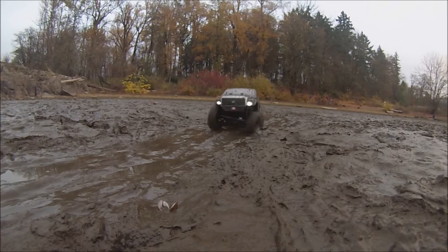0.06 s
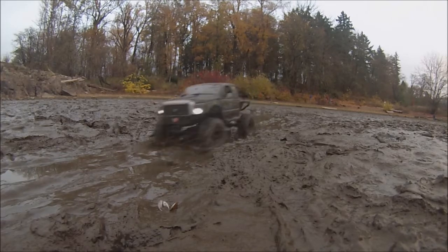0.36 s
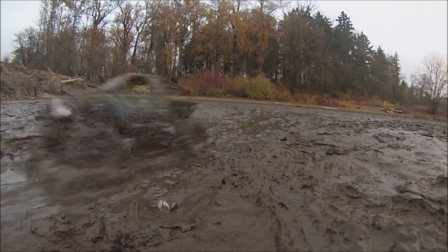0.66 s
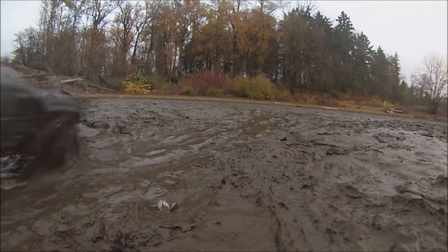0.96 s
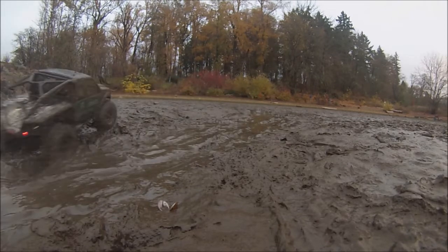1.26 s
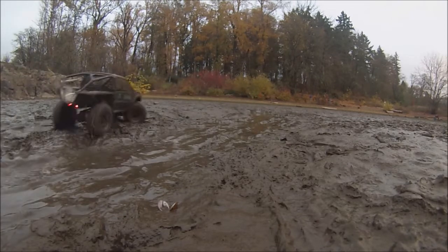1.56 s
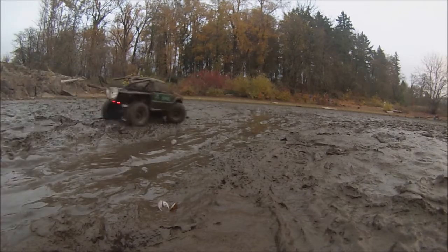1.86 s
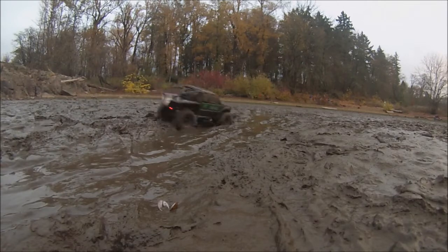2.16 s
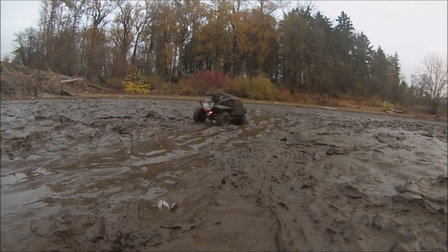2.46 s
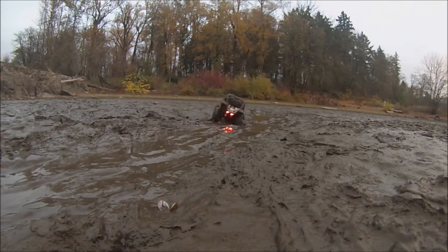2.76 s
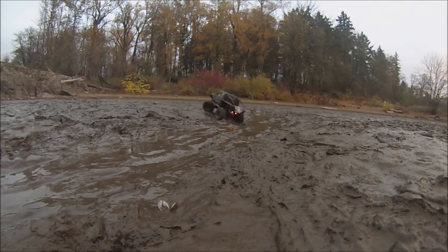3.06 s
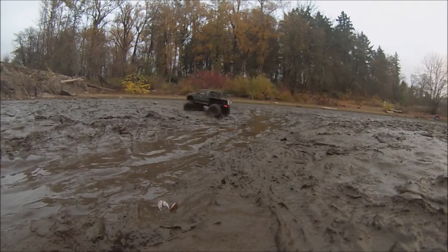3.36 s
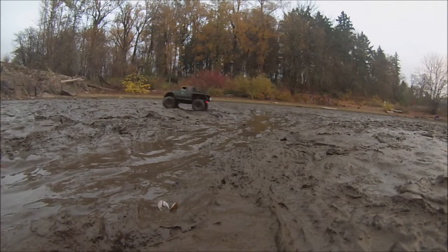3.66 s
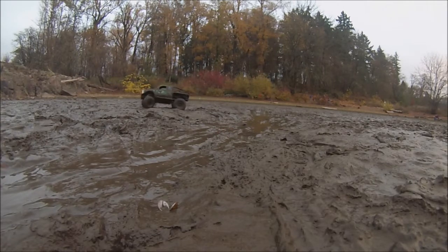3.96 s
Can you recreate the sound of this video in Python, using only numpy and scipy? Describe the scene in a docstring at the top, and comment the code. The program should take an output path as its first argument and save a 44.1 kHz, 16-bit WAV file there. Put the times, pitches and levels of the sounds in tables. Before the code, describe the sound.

A small remote-controlled truck drives through mud outdoors, its electric motor whining unevenly. Its gears rattle close by as mud splatters faintly and air buffets the microphone, then the whine continues more softly in short bursts.

```python
"""A small radio-controlled truck churns through mud close by, under the hush of open ground. From the
start its gears whine at the tooth rate, sagging as the tyres bite and rising as they slip. From 0.14 s
a second electric drive whines and rattles nearby, its teeth exciting resonances in a plastic housing.
Gears squeal briefly, mud spatters and air buffets the microphone. At 1.64 s the second drive cuts
out, and the truck drives off, still splashing, its fainter whine singing out in short bursts."""
import sys
import numpy as np
from scipy import signal
from scipy.fft import rfft, irfft
from scipy.io import wavfile
from scipy.ndimage import uniform_filter1d, map_coordinates

SR = 44100
rng = np.random.default_rng(int(sys.argv[2]) if len(sys.argv) > 2 else 0)


def wav_record(signal):
    """Record a signal, one row per channel, as 16-bit PCM in the file named by sys.argv[1]."""
    frames = np.transpose(np.atleast_2d(signal))
    bounded = np.clip(frames, -1, 1)
    # unit amplitude maps onto the largest positive 16-bit level
    quanta = np.round(bounded * 32767).astype(np.int16)
    wavfile.write(sys.argv[1], SR, quanta)


N = 176400
T = np.arange(N) / SR

# Spectra of the open air and of the buffeting: frequency_hz, gain_db
AIR_SPECTRUM = [(30, 2), (120, 0.5), (200, -4), (400, -6.5), (1000, -13), (2000, -17.5), (4000, -18.5),
                (7000, -26), (11000, -32.5), (15000, -44)]
BUFFET_SPECTRUM = [(15, -4.5), (32, 9), (48, -0.5), (66, 8.5), (88, -3.5), (150, -20.5), (400, -38)]
# Gusts on the microphone: time_s, level_db
BUFFET_LEVEL = [(0.0, -66), (0.61, -58.5), (0.65, -47.5), (0.91, -55), (0.99, -41.5), (1.08, -56),
                (1.15, -50), (1.18, -60), (1.3, -49.5), (1.34, -66), (1.39, -52), (1.64, -65.5),
                (3.89, -70.5), (4.0, -86)]
# Spectrum of the mud drops: frequency_hz, gain_db
MUD_SPECTRUM = [(800, -23), (2000, -25), (4000, 0), (5500, 2), (6800, 5.5), (8500, -13.5), (10500, 2),
                (13000, -24), (15000, -38)]
# Larger splashes: time_s, level_db, rise_s
MUD_SPLASHES = [(0.448, -54.5, 0.011), (0.805, -53.5, 0.011), (1.198, -55, 0.018), (1.631, -57, 0.005),
                (1.756, -59.5, .018), (1.897, -62, 0.009), (1.961, -60.5, 0.0066), (2.551, -64, 0.0057),
                (2.684, -64, 0.0047), (3.508, -61.5, 0.0054), (3.806, -63.5, 0.0061)]
# Brief gear squeals: centre_s, length_s, start_hz, end_hz, relative_level_db
GEAR_SQUEALS = [(0.189, 0.054, 1280, 1210, -48.5), (0.24, 0.021, 2430, 2270, -41.5),
                (1.226, 0.032, 1487, 1640, -48), (1.508, 0.022, 1120, 1210, -52.5),
                (1.591, 0.12, 1390, 1344, -54), (2.969, 0.067, 1650, 1470, -61.5)]

# Near drive's whine: time_s, tooth_rate_hz, level_db
NEAR_MESH = [(0.13, 2396, -56), (0.396, 2380, -65), (0.558, 2424, -80), (0.628, 2408, -46),
             (0.692, 2311, -47.5), (0.752, 2379, -52), (0.83, 2384, -38.5), (0.88, 2310, -45),
             (0.984, 2232, -48), (1.042, 2445, -40), (1.08, 2445, -42), (1.122, 2295, -32.5),
             (1.15, 2342, -48), (1.175, 2379, -39.5), (1.192, 2329, -34.5), (1.25, 2288, -34),
             (1.26, 2380, -44), (1.27, 2397, -38.5), (1.314, 2404, -39.5), (1.336, 2486, -39.5),
             (1.37, 2413, -38), (1.395, 2416, -35), (1.44, 2372, -43.5), (1.514, 2426, -33),
             (1.536, 2350, -37.5), (1.58, 2483, -37), (1.63, 2274, -44.5)]
# Its second harmonic: time_s, level_db
NEAR_OCTAVE_LEVEL = [(.13, -71), (.95, -64), (1.04, -56), (1.23, -58), (1.3, -63), (1.51, -63), (1.63, -66)]
# Its other gears: tooth_rate_multiple, level_db
NEAR_GEAR_TONES = [(0.355, -67.5), (.48, -59.5), (0.529, -63), (.56, -61), (1.215, -61.5)]
# Its rattle: time_s, relative_mid_db, relative_treble_db
NEAR_RATTLE_LEVEL = [(0.14, -47.5, -56), (0.2, -53, -56.5), (0.23, -54, -50.5), (0.254, -51, -58),
                     (0.312, -51.5, -53), (0.65, -50.5, -53), (1.008, -45.5, -49.5), (1.012, -46.5, -48.5),
                     (1.492, -55, -52.5), (1.508, -42, -53), (1.532, -58, -52.5), (1.62, -56, -57)]
# Its housing's resonances, middle range and treble: frequency_hz, gain_db
NEAR_MID_MODES = [(300, -19), (620, -13.5), (790, -18.5), (1010, -11), (1120, 7.5), (1300, 2), (1560, 2.5),
                  (1740, -11), (1900, 3), (2150, -7), (2420, 7), (2720, -3), (2950, -1), (3180, -13.5),
                  (4000, -35)]
NEAR_TREBLE_MODES = [(2600, -21), (3200, -8), (3500, 8), (3800, 6), (4300, -8.5), (4900, -1), (5200, 2),
                     (5600, -10.5), (6200, -1.5), (7000, -4), (8000, -11.5), (8700, -15.5), (10300, -10.5),
                     (12500, -26), (15000, -44)]

# Truck's gear speed: time_s, tooth_rate_hz
TRUCK_MESH = [(0.0, 2310), (0.09, 2207), (0.125, 2240), (0.16, 1997), (0.205, 1834), (0.235, 1885),
              (0.29, 2146), (0.322, 1836), (0.35, 1852), (0.372, 1992), (0.438, 2160), (0.46, 2014),
              (0.492, 2170), (0.552, 2135), (0.65, 2250), (0.784, 2133), (0.834, 1900), (0.874, 2222),
              (0.98, 1884), (1.07, 2299), (1.115, 1978), (1.17, 2213), (1.225, 1949), (1.328, 2160),
              (1.38, 1927), (1.425, 1826), (1.45, 2016), (1.49, 2119), (1.53, 1877), (1.572, 2122),
              (1.615, 2042), (1.655, 1792), (1.7, 2060), (1.736, 2063), (1.799, 1792), (1.84, 2057),
              (1.884, 2168), (1.93, 1804), (2.02, 2194), (2.128, 2104), (2.266, 2450), (2.344, 2040),
              (2.39, 2293), (2.43, 2020), (2.485, 2300), (2.525, 2067), (2.551, 1860), (2.595, 2174),
              (2.625, 2268), (2.67, 2022), (2.697, 1815), (2.745, 2313), (2.773, 2258), (2.82, 1711),
              (2.878, 2250), (2.965, 1812), (3.036, 2000), (3.12, 1936), (3.196, 2116), (3.23, 2013),
              (3.27, 1809), (3.352, 1962), (3.41, 1896), (3.452, 2088), (3.495, 2051), (3.535, 1806),
              (3.58, 2127), (3.62, 2033), (3.698, 1800), (3.762, 2166), (3.79, 2180), (3.82, 1862),
              (3.895, 2337), (3.938, 1960), (3.958, 1906), (4.0, 2136)]
# Its whine between bursts, its upper partials together, and its slow gear: time_s, level_db
TRUCK_WHINE_LEVEL = [(0, -49.5), (.3, -51), (.65, -48), (1.0, -54.5), (1.6, -49), (1.8, -56.5),
                     (2.3, -55.5), (2.95, -60), (3.68, -63), (3.77, -57.5), (4, -55)]
TRUCK_PARTIALS_LEVEL = [(0, -67.5), (1.6, -74.5), (2.2, -72.5), (2.8, -71), (4, -77)]
TRUCK_SLOW_GEAR_LEVEL = [(0, -73), (1.0, -64), (1.5, -69), (2.25, -68.5), (2.6, -76), (4, -72)]
# The gear whine and its octave sing out in short bursts: start_s, length_s, level_db
WHINE_BURSTS = [(.16, 0.034, -33.5), (.214, 0.037, -38), (.301, 0.025, -36.5), (.328, .033, -38.5),
                (.822, 0.041, -43.5), (1.02, 0.086, -43.5), (1.195, 0.021, -42), (1.34, 0.024, -39),
                (1.405, 0.028, -48), (1.445, 0.035, -46), (1.497, 0.029, -45), (1.59, 0.035, -45.5),
                (1.69, 0.081, -57), (1.89, .017, -50), (1.952, 0.029, -51), (2.035, 0.091, -49),
                (2.122, .055, -47), (2.41, 0.048, -50), (2.5, .03, -53.5), (2.526, 0.023, -42),
                (2.557, 0.026, -47), (2.6, 0.048, -54.5), (2.66, .03, -43), (2.708, 0.019, -49),
                (2.735, 0.054, -46.5), (2.785, 0.023, -48), (2.842, 0.025, -49), (2.872, 0.021, -49),
                (2.9, 0.04, -48.5), (3.025, 0.074, -45), (3.13, 0.094, -53), (3.437, .08, -51),
                (3.566, 0.066, -45), (3.801, 0.017, -47), (3.828, 0.019, -54), (3.925, 0.022, -44.5),
                (3.964, 0.042, -54)]
OCTAVE_BURSTS = [(.213, 0.021, -50.5), (.342, 0.013, -53), (1.755, 0.039, -62), (2.5, 0.027, -64),
                 (2.54, 0.029, -57), (2.775, 0.031, -67), (2.9, 0.032, -61), (3.118, 0.052, -60.5),
                 (3.21, 0.027, -63), (3.355, 0.034, -62), (3.413, 0.015, -54.5), (3.455, .03, -60.5),
                 (3.504, .018, -54.5), (3.69, 0.049, -65), (3.78, 0.034, -67), (3.925, 0.025, -62)]
# Upper gear partials: tooth_rate_multiple, gain_db
TRUCK_PARTIALS = [(1.558, 0), (1.799, -1.5), (2, 2.5), (2.138, -11), (3.002, -13)]
# How strongly the body radiates them: frequency_hz, gain_db
BODY_RADIATION = [(3400, -2), (3750, 4), (4550, -4.5), (5400, -18), (5650, 19), (5900, -36)]
# Truck's rattle, middle range and treble: time_s, relative_level_db
TRUCK_MID_RATTLE = [(1.68, -55), (2.2, -64), (2.53, -58.5), (2.62, -67.5), (2.68, -55.5), (2.7, -60.5),
                    (3.43, -61.5), (4.0, -55)]
TRUCK_TREBLE_RATTLE = [(1.7, -59.5), (2.3, -62), (2.8, -67), (3.5, -63), (4, -66.5)]
# Its housing's resonances, middle range and treble: frequency_hz, gain_db
TRUCK_MID_MODES = [(500, -23), (750, -14.5), (1000, -8), (1200, 1), (1360, 10), (1720, -15.5), (2100, 2.5),
                   (2700, -6), (3300, -11), (5000, -39.5)]
TRUCK_TREBLE_MODES = [(2300, -21), (3000, 0.5), (3800, -6), (4400, -1.5), (5000, -2.5), (5350, -12.5),
                      (5700, -7), (6200, -7.5), (6650, 4.5), (7100, -8), (8600, -19.5), (10400, -12),
                      (12000, -19), (15000, -34)]

# Spectra of the near drive's thrum and of the air's stereo width: frequency_hz, gain_db
THRUM_SPECTRUM = [(60, 0), (150, 0.5), (500, -4.5), (1000, -2.5), (3000, -61)]
WIDTH_SPECTRUM = [(30, -16), (200, 2.5), (600, 3.5), (2000, -16), (4500, -6.5), (10000, -8.5),
                  (15000, -49)]


def undb(db):
    """Amplitude ratio: a factor of ten for every 20 dB."""
    return 10 ** (np.asarray(db) / 20)


def curve(rows, column=1):
    """Linear interpolation of one table column in time."""
    rows = np.array(rows, float)
    return np.interp(T, rows[:, 0], rows[:, column])


def unit(x):
    """Normalisation to rms 1."""
    return x / np.sqrt(np.mean(x ** 2) + 1e-20)


def colour(x, spectrum):
    """Minimum-phase filtering: resonances ring only after their excitation; rms 1."""
    hz, db = np.array(spectrum, float).T
    f = np.maximum(np.arange(N // 2 + 1) * SR / N, 1)
    gain = undb(np.interp(np.log(f), np.log(hz), db))
    cepstrum = irfft(np.log(gain), N)
    cepstrum[1:N // 2] *= 2  # folding the cepstrum makes the response causal
    cepstrum[N // 2 + 1:] = 0
    return unit(irfft(rfft(x) * np.exp(rfft(cepstrum)), N))


def walk(cutoff_hz):
    """Smooth random fluctuation: low-passed noise of rms 1."""
    f = np.arange(N // 2 + 1) * SR / N
    return unit(irfft(rfft(rng.standard_normal(N)) / (1 + (f / cutoff_hz) ** 2), N))


def flutter(depth_db):
    """Random amplitude modulation with capped peaks; rms 1."""
    return unit(undb(depth_db * np.minimum(walk(24), 1)))


def noise(spectrum):
    """Spectral shaping of white noise; rms 1."""
    return colour(rng.standard_normal(N), spectrum)


def air():
    """Broadband noise, nearly steady: the hush of open ground."""
    return undb(-59.5 + 0.71 * walk(3.4)) * noise(AIR_SPECTRUM)


def buffeting():
    """Pressure fluctuations of air on the microphone make a low rumble."""
    return undb(curve(BUFFET_LEVEL)) * noise(BUFFET_SPECTRUM)


def drops(per_s, decay_s=0.003):
    """Shot noise: mud drops land at random, each a tick with an exponential tail."""
    ticks = (rng.random(N) < per_s / SR) * rng.standard_normal(N)
    tail = rng.standard_normal(N) * np.exp(-T / decay_s)
    return colour(irfft(rfft(ticks) * rfft(tail), N), MUD_SPECTRUM)


def mud():
    """Sparse impacts of mud from the tyres crackle; dense ones merge into splashes."""
    splash_gain = 0
    for time_s, db, rise_s in MUD_SPLASHES:
        age = np.maximum(T - time_s + 0.0036, 0) / rise_s
        splash_gain += undb(db) * age * np.exp(1 - age)
    spatter = undb(-79) * drops(per_s=160) * flutter(depth_db=2)
    return spatter + splash_gain * drops(per_s=11000)


def squeals():
    """Loaded gears squeal in linear frequency glides under half-sine envelopes."""
    glides = np.zeros(N)
    for centre_s, length_s, start_hz, end_hz, db in GEAR_SQUEALS:
        along = np.clip((T - centre_s) / length_s + .5, 0, 1)
        phase = np.cumsum(start_hz + (end_hz - start_hz) * along) / SR
        glides += undb(db) * np.sin(np.pi * along) * np.sin(2 * np.pi * phase)
    return np.sqrt(2) * glides * (1 + walk(87))


def mesh(tooth_hz, wobble):
    """Phase, in teeth, is the integral of the tooth rate, which backlash modulates."""
    return np.cumsum(tooth_hz * (1 + wobble * walk(90))) / SR


def tone(phase, rough):
    """Amplitude modulation: a gear partial varies in strength from turn to turn."""
    return unit(np.sin(2 * np.pi * phase) * (1 + rough * walk(74)))


def rasp(phase, smear_cycles):
    """Phase modulation: play between the teeth broadens a partial."""
    return tone(phase + smear_cycles * walk(93), rough=0.36)


def rattle(phase, scatter_db, scrape, throb=0.11, teeth=14):
    """Impact excitation: an uneven knock per tooth plus scraping, throbbing once per motor turn."""
    contacts = np.diff(np.floor(phase), prepend=0)
    knocks = contacts * rng.standard_normal(N) * undb(scatter_db * rng.standard_normal(N))
    force = unit(knocks) + scrape * rng.standard_normal(N)
    return force * (1 + throb * np.cos(2 * np.pi * phase / teeth))


def flex(x, share):
    """Frequency modulation: resonances wander by a share of their frequency as the housing flexes."""
    return map_coordinates(x, [np.cumsum(1 + share * walk(11))], mode="mirror")


def near_drive(on_s=0.137, off_s=1.636, ramp_s=0.024):
    """Forced vibration: while the second drive runs, its teeth whine and shake its housing."""
    switch_on = np.clip((T - on_s) / ramp_s + .5, 0, 1)
    switch_off = np.clip((off_s - T) / ramp_s + .5, 0, 1)
    phase = mesh(curve(NEAR_MESH), wobble=0.0046)
    whine = undb(curve(NEAR_MESH, column=2)) * tone(phase, rough=0.32)
    harmonics = tone(2 * phase, rough=0.63) + undb(-7) * tone(3 * phase, rough=0.61)
    harmonics *= undb(curve(NEAR_OCTAVE_LEVEL))
    other_gears = sum(undb(db) * tone(multiple * phase, rough=0.37) * flutter(depth_db=4.5)
                      for multiple, db in NEAR_GEAR_TONES)
    knocks = rattle(phase, scatter_db=-2.5, scrape=0.93)
    mid = colour(knocks, NEAR_MID_MODES) * undb(curve(NEAR_RATTLE_LEVEL) + 2 + 0.33 * walk(25))
    grinding = flex(colour(knocks, NEAR_TREBLE_MODES), share=.02) * flutter(depth_db=1.4)
    treble = grinding * undb(curve(NEAR_RATTLE_LEVEL, column=2) - 2.2)
    thrum = undb(-61) * noise(THRUM_SPECTRUM)
    return switch_on * switch_off * (whine + harmonics + other_gears + mid + treble + thrum)


def truck_housing(phase):
    """Resonance: the plastic housing filters the tooth impacts into a rattle."""
    knocks = rattle(phase, scatter_db=0.5, scrape=0.63)
    mid_gain = undb(curve(TRUCK_MID_RATTLE) - 2 + 2.14 * walk(10))
    treble_gain = undb(curve(TRUCK_TREBLE_RATTLE) - 3 + 3.1 * walk(12))
    return mid_gain * colour(knocks, TRUCK_MID_MODES) + treble_gain * colour(knocks, TRUCK_TREBLE_MODES)


def truck_slow_gear(tooth_hz, ratio=.356):
    """Gear reduction: a lower tone follows the smoothed tooth rate."""
    phase = mesh(uniform_filter1d(tooth_hz, SR // 6), wobble=.03)
    return undb(curve(TRUCK_SLOW_GEAR_LEVEL)) * tone(ratio * phase, rough=.6)


def truck_partials(tooth_hz, phase):
    """Radiation depends on frequency: upper partials swell as they cross the body's peaks."""
    body_hz, body_db = np.array(BODY_RADIATION, float).T
    partials = 0
    for multiple, db in TRUCK_PARTIALS:
        partial = rasp(multiple * phase, smear_cycles=.1) * flutter(depth_db=5)
        partials += undb(db + np.interp(multiple * tooth_hz, body_hz, body_db)) * partial
    return partials * undb(curve(TRUCK_PARTIALS_LEVEL))


def bursts(rows, skew=.85, roundness=0.47):
    """Amplitude envelope of short bursts; exponents under 1 give an early peak and a flat top."""
    gain = np.zeros(N)
    for start_s, length_s, db in rows:
        along = np.clip((T - start_s) / length_s, 0, 1)
        gain += undb(db) * np.abs(np.sin(np.pi * along ** skew)) ** roundness
    return gain


def truck_whine(tooth_hz, phase, axle_slip=.02):
    """Beating: two axles whine slightly apart. The whine and its octave also sing out in short bursts."""
    rear_phase = mesh(tooth_hz * (1 + axle_slip * walk(12)), wobble=.012)
    axles = unit(tone(phase, rough=.4) + rasp(rear_phase, smear_cycles=.17)) * flutter(depth_db=2)
    ringing = bursts(WHINE_BURSTS) * tone(phase + .05 * walk(200), rough=.19)
    octave = bursts(OCTAVE_BURSTS) * rasp(2 * phase, smear_cycles=0.12) * flutter(depth_db=2.5)
    return undb(curve(TRUCK_WHINE_LEVEL)) * axles + ringing + octave


def truck():
    """Gear meshing: one tooth rate governs the truck's tones and its rattle."""
    tooth_hz = curve(TRUCK_MESH)
    phase = mesh(tooth_hz, wobble=.005)
    tones = truck_whine(tooth_hz, phase) + truck_partials(tooth_hz, phase) + truck_slow_gear(tooth_hz)
    return tones + truck_housing(phase)


def scene():
    """Superposition: all sources add in the centre; faint antiphase noise gives the air width."""
    centre = buffeting() + truck() + squeals() + near_drive() + mud() + air()
    side = undb(-83.5) * noise(WIDTH_SPECTRUM)
    return np.array([centre + side, centre - side])


def record(dry, cutoff_hz=14900):
    """Band limiting: a steep low-pass filter cuts the top of the treble."""
    return signal.sosfilt(signal.ellip(12, .2, 80, cutoff_hz, fs=SR, output="sos"), dry)


dry = scene()
out = record(dry)
wav_record(out)
```